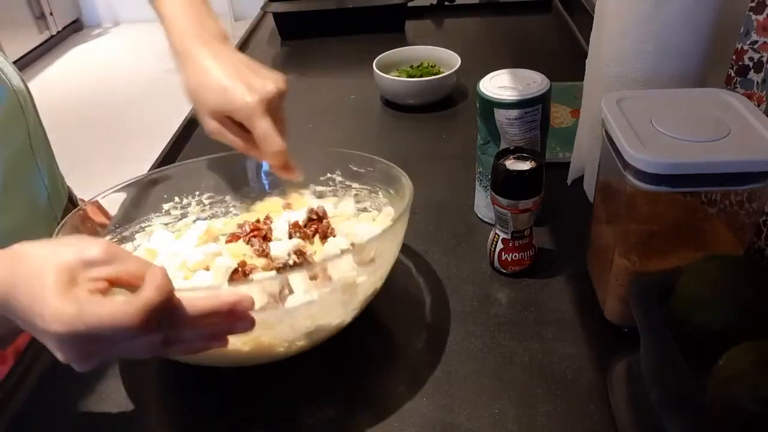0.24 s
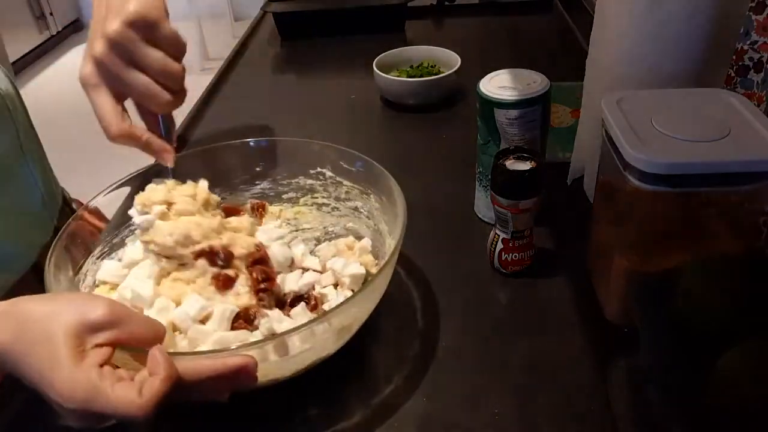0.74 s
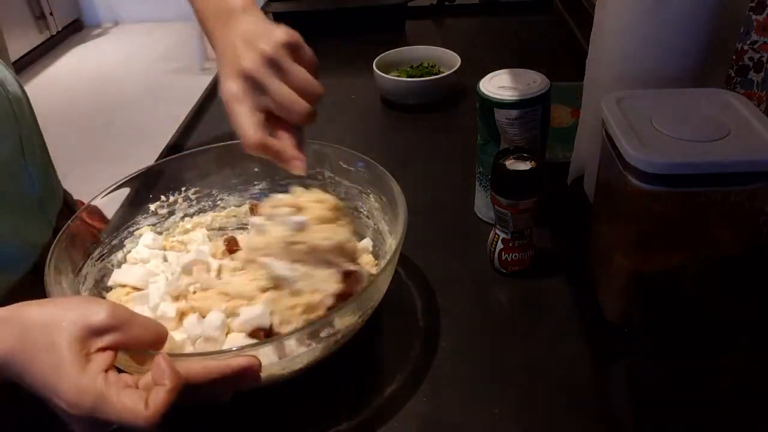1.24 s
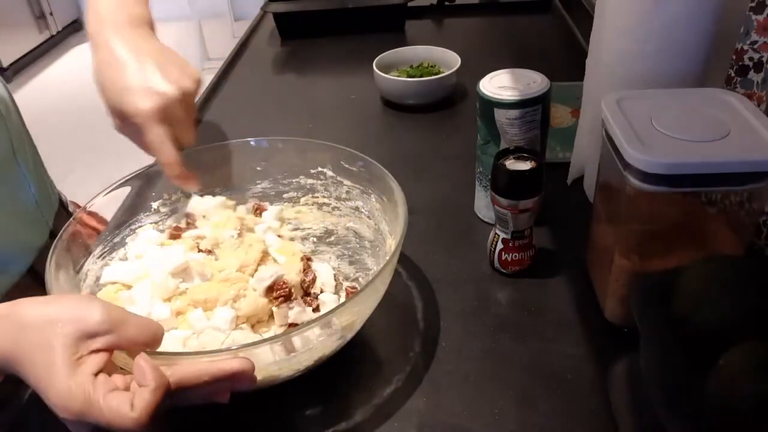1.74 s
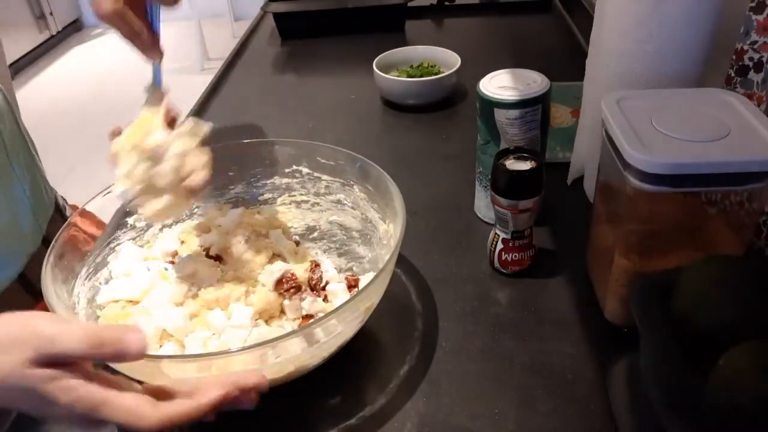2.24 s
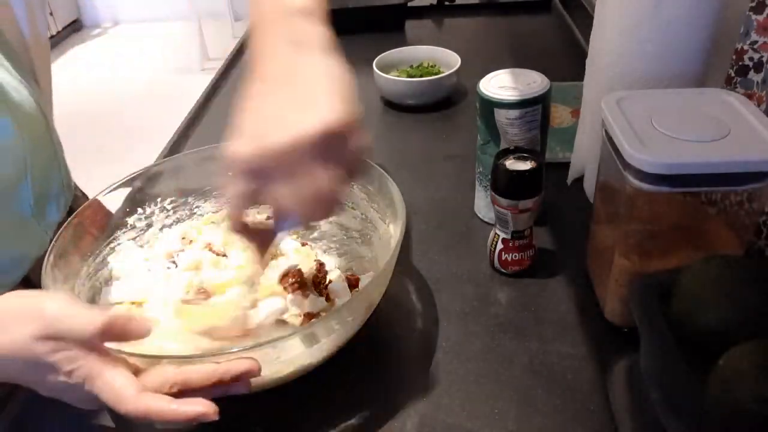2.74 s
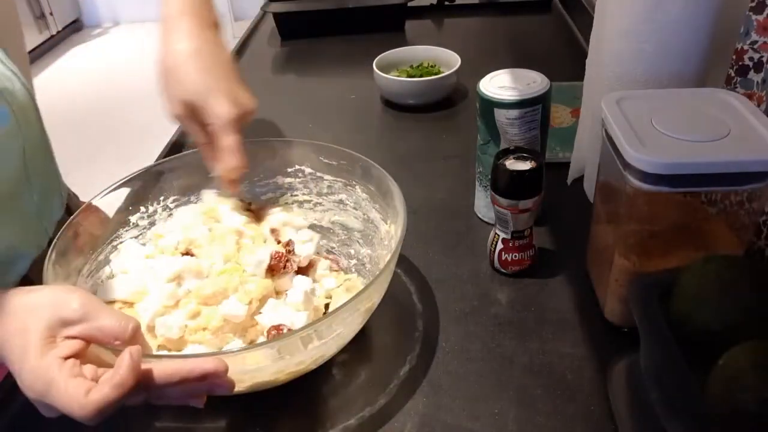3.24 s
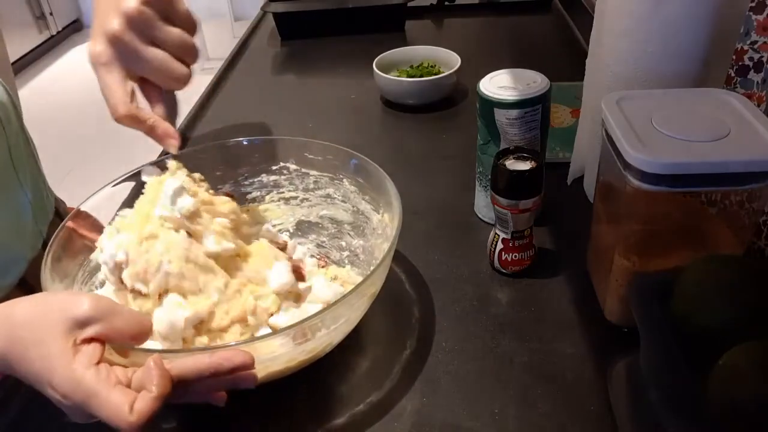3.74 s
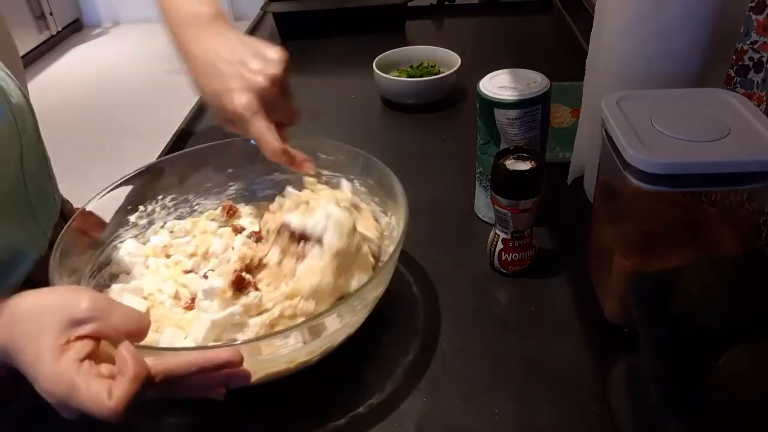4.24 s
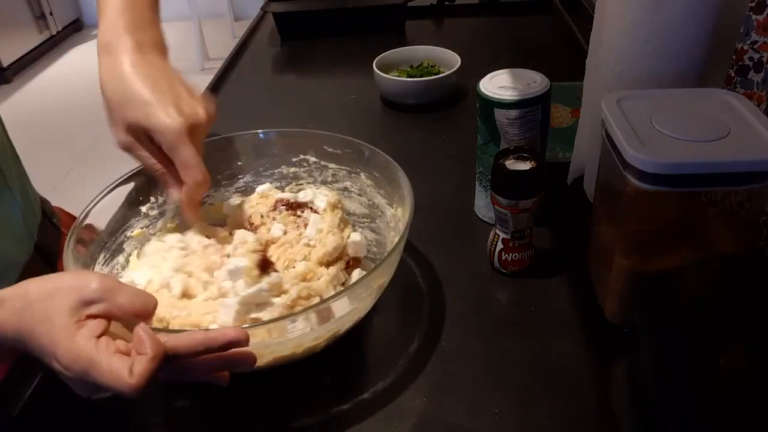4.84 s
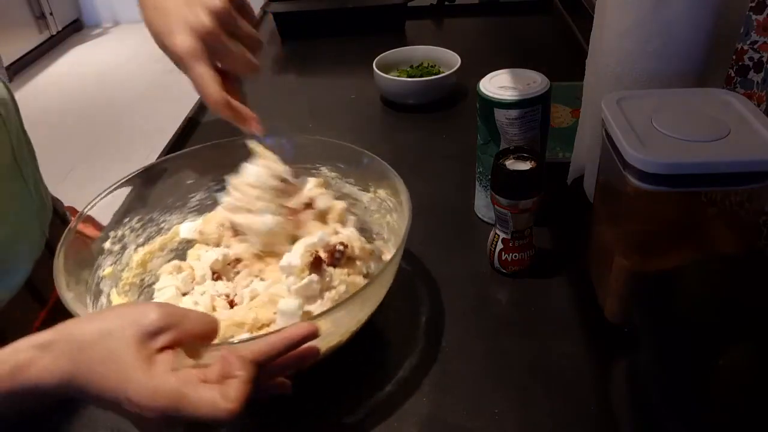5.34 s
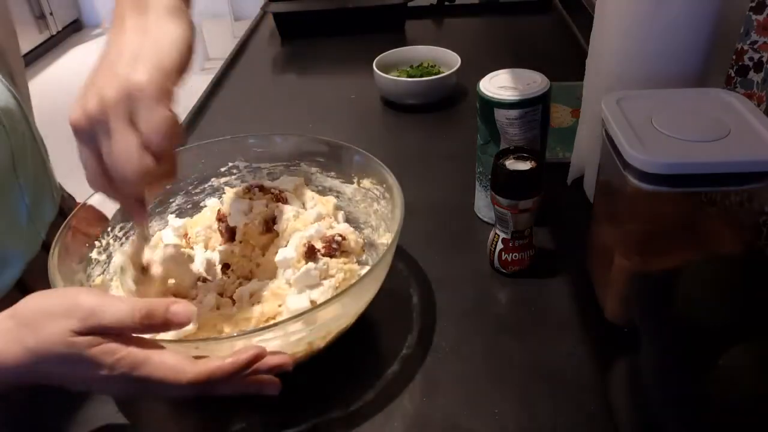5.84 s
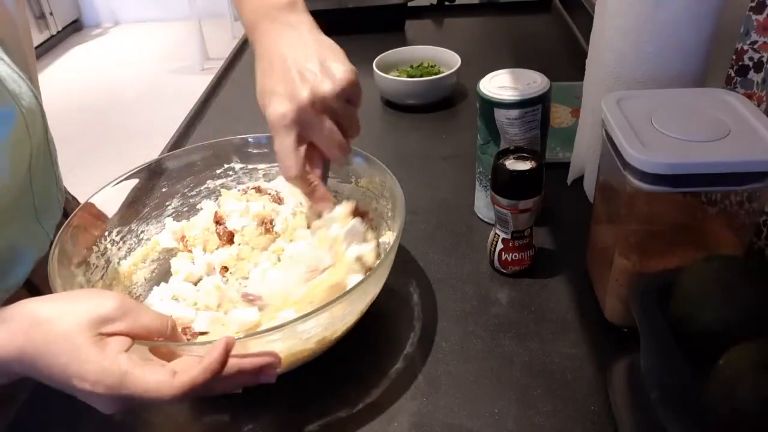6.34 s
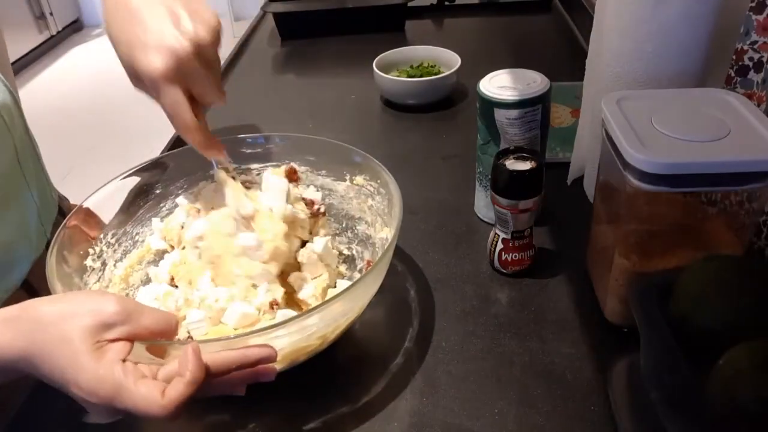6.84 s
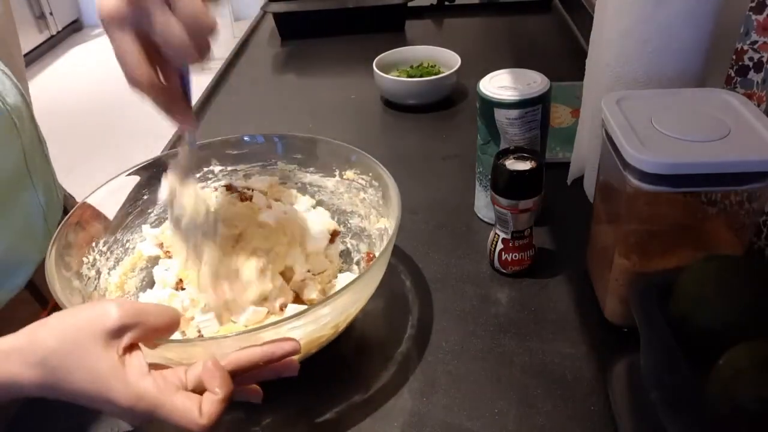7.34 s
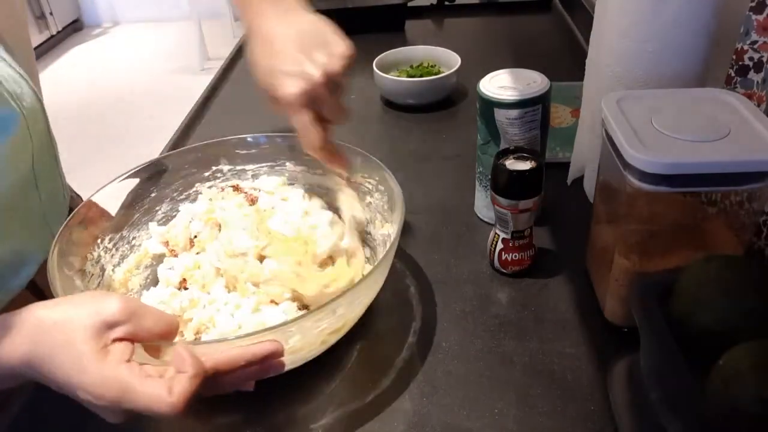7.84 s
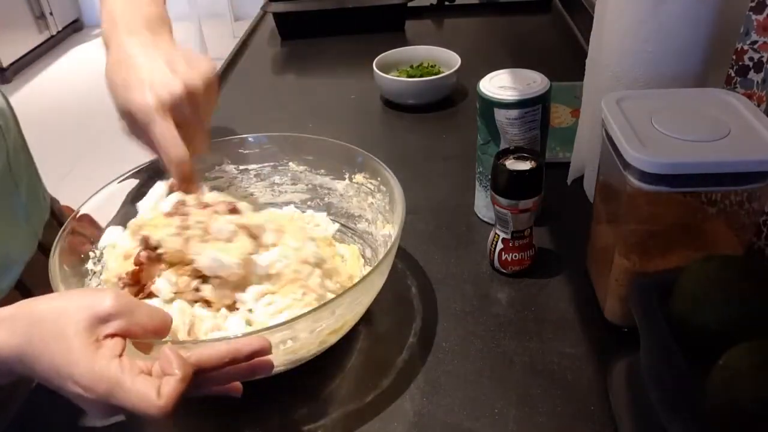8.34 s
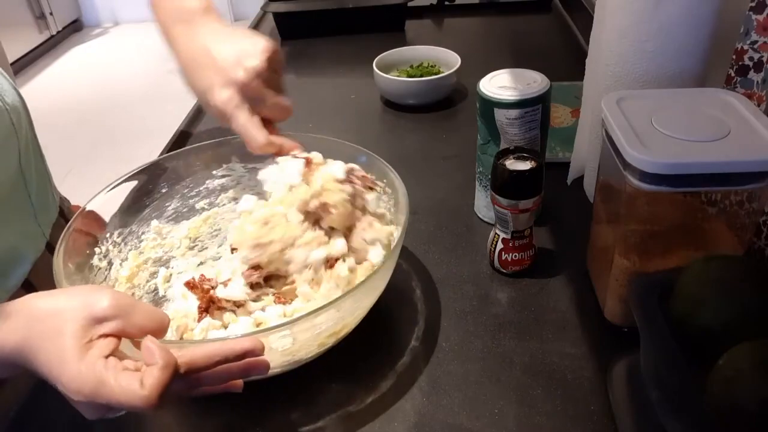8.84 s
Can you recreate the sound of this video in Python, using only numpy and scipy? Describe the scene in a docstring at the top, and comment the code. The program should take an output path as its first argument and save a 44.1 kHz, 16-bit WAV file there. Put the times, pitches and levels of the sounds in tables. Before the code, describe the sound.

A spoon folds thick, sticky batter in a glass bowl with uneven wet squelches, popping air pockets and one sharp early knock on glass.

```python
"""On a kitchen counter in a small, live room, a spoon folds thick batter with cheese pieces in a glass bowl.
Strokes squelch, crackle and smear: random clicks strike resonances. Trapped air pops as short rising tones.
Strands part with ticks, the glass rings once under a hard knock, and filtered noise squeaks.
The hand-held bowl rumbles and bumps softly in low tones; an appliance hums over a rush of air and faint hiss.
"""
import sys
import numpy as np
from scipy import signal
from scipy.fft import rfft, irfft, next_fast_len
from scipy.io import wavfile
from scipy.ndimage import uniform_filter1d

SR = 44100
rng = np.random.default_rng(int(sys.argv[2]) if len(sys.argv) > 2 else 0)


def master(y):
    """Save y as 16-bit WAV."""
    cut = np.clip(np.atleast_2d(y).T, -1, 1)
    pcm = np.round(cut * 32767)  # scale
    wavfile.write(sys.argv[1], SR, pcm.astype(np.int16))


N = 401333

# A "t60" is always the time a sound takes to die away by 60 dB.
# the largest air pockets bursting: (time [s], level [dB], pitch [Hz])
BIG_POPS = [(1.651, -24, 1140), (1.675, -27, 1130), (1.689, -22.5, 1130), (1.703, -17.5, 1755),
            (1.722, -17, 1090), (1.729, -18, 1117), (3.274, -25, 1140), (3.61, -34, 1160),
            (4.4015, -27.5, 1510), (4.7317, -31, 1034), (5.058, -38, 1600), (6.8566, -33.5, 1710),
            (7.944, -27.5, 1205), (8.096, -22, 2100), (8.113, -18.5, 1830), (8.137, -17, 2120),
            (8.152, -20, 1190), (8.159, -15.5, 1220)]
# the thickest strands letting go: (time [s], level [dB], pitch [Hz])
THICK_STRANDS = [(0.2805, -40, 3100), (1.0406, -39, 3880), (1.603, -45, 3300), (2.6323, -48, 6540),
                 (3.2177, -33, 3320), (3.3888, -39, 5860), (4.0545, -40, 3450), (4.357, -34, 5640),
                 (4.4265, -38, 3100), (4.5045, -34, 3340), (4.5607, -36, 3060), (4.7473, -42, 3700),
                 (6.5705, -34, 3040), (6.6025, -36, 2240), (6.8889, -35.5, 3820), (7.7653, -36, 6700),
                 (7.944, -34, 3580), (8.2357, -31, 3930)]
# the bowl bumping on the counter: (time [s], level [dB], pitch [Hz])
BOWL_BUMPS = [(2.93, -36, 89.5), (2.968, -31.5, 131), (2.985, -33, 92), (4.807, -37.5, 111),
              (4.901, -38.5, 161), (6.348, -30.5, 100), (7.588, -38.5, 136), (8.241, -27.5, 115),
              (8.434, -33, 109), (8.596, -37, 152)]
# spoon on glass, a graze, the blow and its rebounds: (time [s], strength [dB])
KNOCK_CONTACTS = [(0.6802, -15), (0.6830, 5), (0.6850, 0), (0.6890, -7.5)]
# ringing tones of the bowl and the counter under it: (pitch [Hz], level [dB], t60 [s])
BOWL_TONES = [(84, -40.5, 0.85), (136.7, -21.5, 0.23), (185, -32, 0.34), (238, -26.5, 0.21),
              (323.5, -43, 0.43), (459, -28.5, 0.26), (586, -24, 0.13), (603, -20.5, 0.076),
              (686, -10.5, 0.039), (784, -15.5, 0.042), (860, -19, 0.032), (1070, -31, 0.033),
              (1210, -18.5, 0.03), (1714, -27, 0.076), (2230, -21, 0.027), (2380, -20, 0.04),
              (2530, -17.5, 0.036), (3060, -27, 0.036), (3320, -26.5, 0.036), (3600, -52, 0.02),
              (4540, -51, 0.015), (5030, -27, 0.019), (6440, -26, 0.026)]
# resonances of the batter, from large cavities to the finest froth: (pitch [Hz], width [Hz], level [dB])
CAVITIES = [(680, 630, -6), (845, 180, -5), (1137, 95, 1), (1576, 78, -3), (1760, 250, -6)]
BUBBLES = [(2180, 150, -2), (2584, 124, -2.5), (3065, 580, 4.5), (3800, 170, -3.5)]
FILMS = [(4160, 1400, 1), (5360, 2000, -2.6), (6620, 860, -0.82), (7200, 1800, -2.8)]
FROTH = [(10500, 4600, -1.2), (11300, 3400, -0.51), (14100, 3700, 0.11)]
# colour of the room's rush of air: (frequency [Hz], relative level [dB per Hz])
AIR_COLOUR = [(22, -30), (40, -10.5), (62, -13), (78, 2), (115, -2), (145, 0), (240, -5.5), (360, -11),
              (630, -5), (900, -12), (1120, -11.5), (1400, -18.5), (2200, -25), (4000, -38.5), (9000, -54)]
# colour of the microphone hiss: (frequency [Hz], relative level [dB per Hz])
HISS_COLOUR = [(1500, -12), (3500, -2), (5000, 1.5), (7100, 2), (8200, -13), (9800, -12.5), (11300, 2),
               (12600, -12), (16000, -12)]
# how alike left and right are, straight from the bowl: (frequency [Hz], likeness [-1 to 1])
BOWL_LIKENESS = [(300, -0.02), (1100, 0.31), (2200, 0.27), (4000, -0.0062), (12000, -0.16)]
# how alike left and right are in the room's diffuse sound: (frequency [Hz], likeness [-1 to 1])
ROOM_LIKENESS = [(40, 0.34), (110, 1), (300, 0.47), (700, 0.75), (1500, 0), (3500, 0), (12000, 0)]
# how long the kitchen echoes: (frequency [Hz], t60 [s])
ROOM_T60 = [(100, 0.68), (500, 0.68), (1500, 0.66), (3000, 0.6), (7000, 0.36), (14000, 0.38)]
# colour of those echoes: (frequency [Hz], relative level [dB])
ROOM_COLOUR = [(100, -5), (250, 2.5), (550, 1.5), (1200, -3.5), (2700, -0.5), (6000, -0.5), (14000, -1)]
# spoon rubbing the glass: (time [s], length [s], pitch [Hz], pitch spread [Hz], level [dB])
SQUEAKS = [(0.994, 0.047, 3860, 280, -57), (1.695, 0.048, 3140, 130, -43), (4.151, 0.079, 2226, 45, -56.5),
           (4.625, 0.065, 3240, 130, -52), (4.672, 0.077, 1070, 150, -50), (6.299, 0.31, 2190, 50, -65),
           (6.488, .14, 2184, 65, -55), (6.64, 0.053, 2180, 50, -58), (7.719, 0.086, 6570, 420, -43)]
# the spoon draws through the batter: (start [s], length [s], level [dB], froth relative to the stroke [dB])
STROKES = [(0.082, 0.68, -62, -6), (0.72, 0.42, -64.5, -4.5), (1.12, 0.66, -67.5, -1.5),
           (1.603, 0.51, -67, -3), (2.668, 0.47, -61.5, -6), (3.091, 0.56, -62, -3.5),
           (3.69, 0.37, -68, -4.5), (4.037, 0.27, -65, -3), (4.33, 0.25, -55.5, -6),
           (4.724, 0.19, -63.5, -4), (4.948, 0.12, -61, -7), (5.114, 0.13, -59, -5.5),
           (5.373, 0.1, -61, -4.5), (5.878, 0.34, -68, -5), (6.082, 0.62, -65, -3),
           (6.483, 0.29, -64.5, -3.5), (6.781, 0.27, -62.5, -1), (7.1, 0.19, -71.5, -1),
           (7.681, 0.79, -57.5, -4.5), (8.56, 0.2, -65, -6), (8.772, 0.28, -57, -5.5)]
# a fold of batter swells and gives way: (peak time [s], swell [s], level [dB],
# crackle relative to it [dB], smear relative to it [dB], pitch of its air pockets [Hz])
FOLDS = [(0.326, 0.02, -42.5, -6, -8, 1660), (0.368, 0.015, -43, 0.5, -7.5, 1780),
         (0.423, 0.032, -41.5, 0.5, -10, 2660), (0.487, 0.018, -42.5, 1.5, -9, 2950),
         (1.608, 0.006, -48.5, -6, -1.5, 1200), (1.665, 0.03, -40.5, -3, -7, 1110),
         (1.725, 0.04, -37, -7.5, -12.5, 1130), (1.78, 0.025, -46.5, -9, -23, 1700),
         (2.745, 0.034, -50.5, 2.5, -3.5, 1720), (2.801, 0.047, -54, -2, -20, 2290),
         (3.216, 0.042, -46, 2.5, -5, 2040), (3.295, 0.045, -39.5, -1.5, -7, 980),
         (3.37, 0.032, -54, -7, 2.5, 1150), (3.49, 0.015, -56.5, -5, 0, 1110),
         (4.297, 0.022, -54.5, -2.5, -4, 1610), (4.365, 0.015, -51, -5, 4, 1250),
         (4.425, 0.025, -45, -14, -21, 1520), (4.475, 0.022, -48.5, -6, -3.5, 1730),
         (4.615, 0.044, -52, -0.5, 3, 1020), (4.72, 0.027, -55.5, -15, -1, 1070),
         (5.43, 0.1, -58.5, -0.5, -0.5, 1660), (6.55, 0.04, -62.5, 6, -1, 2220),
         (6.876, 0.02, -59, -10, -9, 1700), (7.77, 0.029, -52, 7.5, 3, 2300),
         (7.858, 0.044, -51.5, 7, 5.5, 2300), (8.082, 0.02, -46.5, 3, -10, 2600),
         (8.122, 0.022, -35, -2, -17, 2050), (8.155, 0.026, -35, -8, -13.5, 1240),
         (8.24, 0.051, -51.5, 6.5, 3, 1900), (8.308, 0.018, -58, 7, -2, 1200),
         (9.01, 0.025, -52.5, -5, -2.5, 2500)]
# the mix in a plain stroke, one row per layer (squelch, crackle, smear): (level [dB])
STROKE_MIX_DB = [0, -1.5, 1.5]

# the spoon bites in, the batter settles, and barely stirs between strokes
STROKE_ATTACK_S, STROKE_T60_S, REST_DB = 0.017, 0.51, -82
# a fold collapses; its fizz is set relative to its smear
FOLD_T60_S, FOLD_FIZZ_DB = 0.2, -12.5
# a pocket's ring dies over this many cycles, so small pockets die sooner
POP_CYCLES = 25.8
# the snap of a 0 dB pop, and its gain in dB per dB of pop: bigger pockets gain more ring than snap
SNAP_DB, SNAP_FOLLOWS = -35, 0.46
# small pockets in a fold: peak over the fold's level, scatter of size, and of pitch (as a fraction)
POCKET_DB, POCKET_SPREAD_DB, POCKET_DETUNE = 9, 4, 0.09
POCKET_TAPER_DB = 2.5   # pockets shrink by this for each half swell away from the peak
# thin strands: rate, level over the smear, scatter, and range of pitches
STRANDS_PER_S, STRAND_DB, STRAND_SPREAD_DB = 11, 10.5, 2.5
STRAND_LOW_HZ, STRAND_HIGH_HZ = 3410, 7400
CUTOFF_HZ = 15850


def from_db(db):
    """Turn decibels into a gain."""
    return 10 ** (np.asarray(db) / 20)


def rms_one(x):
    """Scale a sound to an average power of one."""
    return x / np.sqrt(np.mean(x ** 2) + 1e-20)


def at_hz(points, hz):
    """Read a table between its points, with frequency spaced by ratio as in pitch."""
    known_hz, values = np.transpose(points)
    return np.interp(np.log(np.maximum(hz, 1)), np.log(known_hz), values)


def add(track, s, sound):
    """Mix a short sound in at time s."""
    start = int(s * SR)
    track[..., start:start + sound.shape[-1]] += sound[..., :N - start]


def band(x, low_hz, high_hz, order=2):
    """Keep only the frequencies between two limits."""
    edges_hz = [low_hz, min(high_hz, .48 * SR)]
    return signal.sosfilt(signal.butter(order, edges_hz, "band", fs=SR, output="sos"), x + 1e-18)


def resonate(x, hz, width_hz):
    """Ring at one pitch, with about the same power however wide the resonance is."""
    r = np.exp(-np.pi * width_hz / SR)
    strike = np.sqrt(1 - r) * np.array([1, 0, -1])
    ringing = [1, -2 * r * np.cos(2 * np.pi * hz / SR), r * r]
    return signal.lfilter(strike, ringing, x + 1e-18)


def fade(t, t60):
    """Die away smoothly, losing 60 dB in t60 seconds."""
    return np.exp(-np.log(1000) * t / t60)


def drift(per_s):
    """Wander smoothly at random, with an average power of one."""
    knots = rng.standard_normal(int(per_s * N / SR) + 2)
    return rms_one(np.interp(np.arange(N) * per_s / SR, np.arange(len(knots)), knots))


def left_right(pair, likeness, hz):
    """Blend two unrelated signals into ears that are as alike as the table says."""
    mid, side = pair
    alike = np.clip(at_hz(likeness, hz), -1, 1)
    return np.sqrt(1 + alike) * mid + np.sqrt(1 - alike) * side * [[1], [-1]]


def burst(t, low_hz, high_hz, t60):
    """A stereo puff of noise that starts at once and dies away."""
    noise = band(rng.standard_normal((2, len(t))), low_hz, high_hz)
    puff = left_right(noise, BOWL_LIKENESS, np.sqrt(low_hz * high_hz)) * fade(t, t60)
    return rms_one(puff) * np.sqrt(np.mean(fade(t, t60) ** 2))


def diffuse(colour, size):
    """Stereo noise of a given colour, partly alike in the bass and unrelated in the treble."""
    padded = next_fast_len(size)
    hz = np.arange(padded // 2 + 1) * SR / padded
    both = left_right(rfft(rng.standard_normal((2, padded))), ROOM_LIKENESS, hz)
    return rms_one(irfft(both * from_db(at_hz(colour, hz)), padded)[:, :size])


def background(air_db=-50.5, hiss_db=-66.0, hum_db=-57.0, hum_hz=97.1):
    """An appliance's wavering hum (a pure tone plus narrow noise) and rush of air, over faint hiss."""
    steady = np.sin(2 * np.pi * hum_hz * np.arange(N) / SR)
    wavering = rms_one(band(rng.standard_normal(N), hum_hz - 4, hum_hz + 4))
    hum = from_db(hum_db) * rms_one(steady + .5 * wavering)
    air = from_db(air_db) * diffuse(AIR_COLOUR, size=N)
    hiss = from_db(hiss_db) * diffuse(HISS_COLOUR, size=N)
    return air + hiss + hum


def stirring():
    """Squelch, crackle, smear and fizz levels in dB: strokes rise and settle; folds swell and collapse on top."""
    t = np.arange(0, N / SR, 1 / 1000)   # one step per millisecond is fine enough for levels
    power = from_db(REST_DB) ** 2
    for s, length, db, froth_db in STROKES:
        attack = np.clip((t - s) / STROKE_ATTACK_S, 0, 1)
        drag = attack * fade(np.maximum(t - s - length, 0), STROKE_T60_S)
        mix = from_db([*STROKE_MIX_DB, froth_db])
        power = power + np.outer(mix, from_db(db) * drag) ** 2
    for s, swell, db, crackle_db, smear_db, _ in FOLDS:
        fold = np.exp(np.minimum(t - s, 0) / swell) * fade(np.maximum(t - s, 0), FOLD_T60_S)
        mix = from_db([0, crackle_db, smear_db, smear_db + FOLD_FIZZ_DB])
        power = power + np.outer(mix, from_db(db) * fold) ** 2
    return [np.interp(np.arange(N) / SR, t, level_db) for level_db in 10 * np.log10(power)]


def kneading(squelch_db, level_db=-61.5, with_effort=0.2, lumpy_db=4.5):
    """The heavy mass slumps and drags at the bowl: a lumpy rumble that grows with each stroke."""
    rumble = rms_one(band(rng.standard_normal(N), 73, 246))
    effort_db = with_effort * (squelch_db - np.median(squelch_db))
    return rumble * from_db(level_db + effort_db + lumpy_db * drift(20))


def grains(level_db, resonances, per_s, spread_db, low_hz, high_hz, shifting_db=4.0, crowding=.6):
    """Tiny ruptures of uneven size strike each resonance differently; more of them under a hard stroke."""
    chance = rng.random(N)
    sizes = from_db(spread_db * np.minimum(rng.exponential(1, N), 4))
    rate = per_s * from_db(crowding * np.maximum(level_db - np.median(level_db), 0))
    born = np.flatnonzero(chance < rate / SR)
    rings = 0
    for hz, width_hz, db in resonances:
        # short waves reach the two ears with unlike strength from each spot in the bowl
        strikes = rng.standard_normal((2, N), dtype=np.float32)[:, born]
        clicks = np.zeros((2, N))
        clicks[:, born] = sizes[born] * left_right(strikes, BOWL_LIKENESS, hz)
        # as the mass deforms, each resonance comes and goes
        rings = rings + from_db(db + shifting_db * drift(18)) * resonate(clicks, hz, width_hz)
    rings = band(rings, low_hz, high_hz, order=5)
    # even out the loudness over about 54 ms, so that the level comes from level_db
    nearby_power = np.abs(uniform_filter1d(np.mean(rings ** 2, axis=0), size=2400))
    return from_db(level_db) * rings / np.sqrt(nearby_power + 1e-12)


def batter(squelch_db, crackle_db, smear_db, fizz_db, lumpy_db=2.0, lumps_per_s=25):
    """The spoon squeezes cavities, bursts bubbles, smears wet films and crushes froth, unevenly over lumps."""
    lumps_db = lumpy_db * drift(lumps_per_s)
    squelch = grains(squelch_db + lumps_db + 0.5, CAVITIES, per_s=600, spread_db=3.0, low_hz=390, high_hz=2250)
    crackle = grains(crackle_db + lumps_db - 0.5, BUBBLES, per_s=700, spread_db=1.5, low_hz=1780, high_hz=3930)
    smear = grains(smear_db + lumps_db - 0.5, FILMS, per_s=2200, spread_db=1.5, low_hz=3600, high_hz=7460)
    fizz = grains(fizz_db + lumps_db + 0.5, FROTH, per_s=4500, spread_db=1.5, low_hz=7350, high_hz=16700)
    return squelch + crackle + smear + fizz


def thin_strands(smear_db):
    """Thin strands part at random, louder when the batter is smeared harder: (time [s], level [dB], pitch [Hz])."""
    chance, size, place = rng.random(N), rng.standard_normal(N).clip(-2, 2), rng.random(N)
    level_db = smear_db + STRAND_DB + STRAND_SPREAD_DB * size
    pitch_hz = STRAND_LOW_HZ * (STRAND_HIGH_HZ / STRAND_LOW_HZ) ** place
    return [(i / SR, level_db[i], pitch_hz[i]) for i in np.flatnonzero(chance < STRANDS_PER_S / SR)]


def smacks(smear_db, ring_t60=0.017, snap_t60=0.018, ring_db=-2.0, snap_db=-7.5, spray_db=-13.5):
    """A strand parts with a bright tick (a short tone and a noise snap) and a fine, high spray."""
    out, t = np.zeros((2, N)), np.arange(SR // 30) / SR
    for s, db, hz in THICK_STRANDS + thin_strands(smear_db):
        ring = np.sin(2 * np.pi * hz * t) * fade(t, ring_t60)
        snap = burst(t, 2500, 5500, snap_t60) + from_db(spray_db) * burst(t, 8000, 15000, snap_t60)
        add(out, s, from_db(db) * (from_db(ring_db) * ring + from_db(snap_db) * snap))
    return out


def small_pockets(count=9):
    """Each fold sheds small pops around its peak, close to its own pitch: (time [s], level [dB], pitch [Hz])."""
    chance = rng.standard_normal((len(FOLDS), count, 3)).clip(-2, 2)
    pockets = []
    for (s, swell, db, _, _, hz), run in zip(FOLDS, chance):
        # places run from two half swells before the peak to two after it
        for place, (early, size, detune) in zip(np.linspace(-2, 2, count), run):
            pop_s = s + .5 * swell * (place + .5 * early)
            pop_db = db + POCKET_DB + POCKET_SPREAD_DB * size - POCKET_TAPER_DB * abs(place)
            pockets.append((pop_s, pop_db, hz * (1 + POCKET_DETUNE * detune)))
    return pockets


def pops(snap_t60=0.0091, bend=2.0, ring_db=-3.0):
    """An air pocket tears open with a snap and rings briefly, rising as its mouth widens."""
    out, t = np.zeros((2, N)), np.arange(SR // 20) / SR
    for s, db, hz in BIG_POPS + small_pockets():
        # the bend inside the sine makes the pitch climb steadily
        ring = np.sin(2 * np.pi * hz * t * (1 + bend * t)) * fade(t, POP_CYCLES / hz)
        snap = from_db(SNAP_DB + SNAP_FOLLOWS * db) * burst(t, 1200, 5700, snap_t60)
        add(out, s, from_db(db + ring_db) * ring + snap)
    return band(out, 590, 6200)


def knock(ring_db=0.0, crack_db=-15.5, crack_t60=0.015, thud_db=-21.0, thud_t60=0.19, lag_s=.00008):
    """The hardest contact rings the batter-damped glass and thuds into the counter; every contact cracks."""
    out, t = np.zeros((2, N)), np.arange(SR // 2) / SR
    arrival = np.maximum(t - [[lag_s], [0]], 0)   # the right ear hears the ring first
    ring = 0
    for k, (hz, db, t60) in enumerate(BOWL_TONES):
        # every second tone starts in the opposite direction
        ring = ring + (-1) ** k * from_db(db) * np.sin(2 * np.pi * hz * arrival) * fade(t, t60)
    blow_s = max(KNOCK_CONTACTS, key=lambda contact: contact[1])[0]
    add(out, blow_s, from_db(ring_db) * ring + from_db(thud_db) * burst(t, 61, 1120, thud_t60))
    for s, db in KNOCK_CONTACTS:
        add(out, s, from_db(db + crack_db) * burst(t, 430, 2340, crack_t60))
    return band(out, 56, 7100, order=3)


def squeaks(overtone=1.83, overtone_db=-13.5):
    """The spoon sticks and slips on the wet glass: a rough, narrow tone with a faint upper partner."""
    out = np.zeros(N)
    for s, length, hz, spread_hz, db in SQUEAKS:
        low, high = rng.standard_normal((2, SR // 2))
        tone = rms_one(band(low, hz - spread_hz, hz + spread_hz))
        partner = rms_one(band(high, overtone * (hz - spread_hz), overtone * (hz + spread_hz)))
        size = int(length * SR)
        swell = np.sin(np.linspace(0, np.pi, size))
        # use the end of the noise, where the filters have settled
        rub = rms_one((tone + from_db(overtone_db) * partner)[-size:])
        add(out, s, from_db(db) * swell * rub)
    return band(out, 520, 6800, order=4)


def bumps(t60=0.092, soft_t60=0.016, level_db=-2.0):
    """Cushioned by the hand, the heavy bowl gives only a low thud with a soft start."""
    out, t = np.zeros(N), np.arange(SR // 3) / SR
    for s, db, hz in BOWL_BUMPS:
        thud = np.sin(2 * np.pi * hz * t) * fade(t, t60) * (1 - fade(t, soft_t60))
        add(out, s, from_db(db + level_db) * thud)
    return out


def kitchen(x, tail_db=-6.5, build_t60=0.0033):
    """Direct sound, then a tail of echoes that builds quickly and dies sooner in the treble."""
    t = np.arange(SR) / SR
    walls = diffuse(ROOM_COLOUR, size=SR)
    edges_hz = np.geomspace(60, 16000, 9)   # eight bands, each with its own decay
    tail = 0
    for low, high in zip(edges_hz, edges_hz[1:]):
        t60 = at_hz(ROOM_T60, np.sqrt(low * high))
        tail = tail + band(walls, low, high, order=3) * fade(t, t60)
    echoes = from_db(tail_db) * rms_one(tail * (1 - fade(t, build_t60))) / np.sqrt(SR)
    return x + signal.fftconvolve(x, echoes, axes=1)[:, :N]


def scene():
    """The bowl sounds into the kitchen over the background, all slightly left of centre."""
    squelch_db, crackle_db, smear_db, fizz_db = stirring()
    bowl = batter(squelch_db, crackle_db, smear_db, fizz_db) + kneading(squelch_db)
    bowl = bowl + smacks(smear_db) + pops() + knock() + squeaks() + bumps()
    return (kitchen(bowl) + background()) * from_db([[.3], [-.3]])


def record(dry):
    """A steep filter cuts off the very highest treble."""
    return signal.sosfilt(signal.ellip(12, .1, 70, CUTOFF_HZ, fs=SR, output="sos"), dry)


dry = scene()
out = record(dry)
master(out)
```